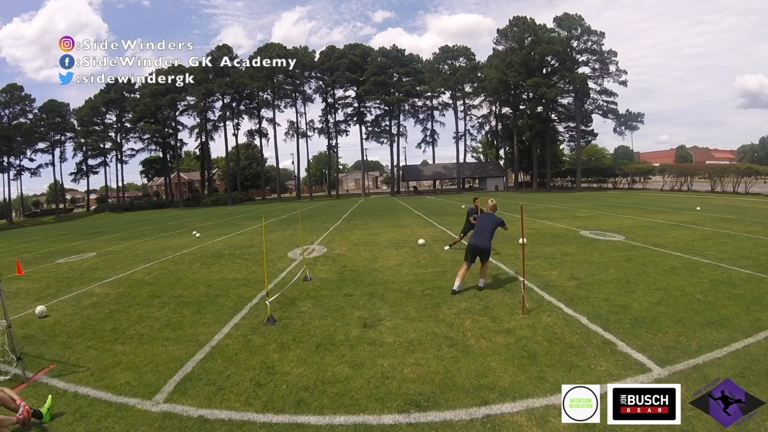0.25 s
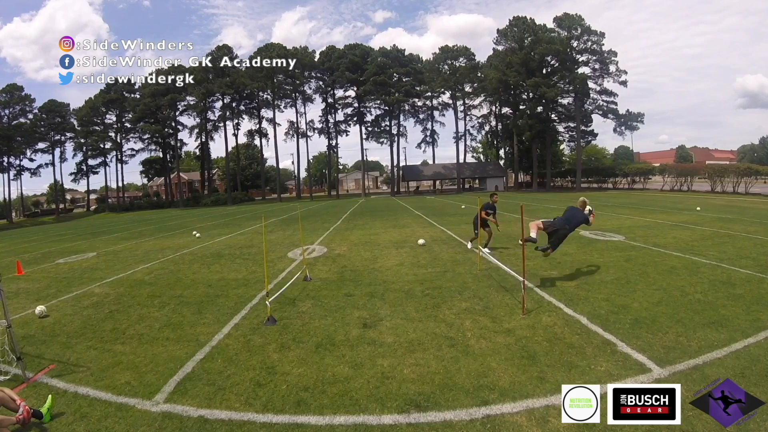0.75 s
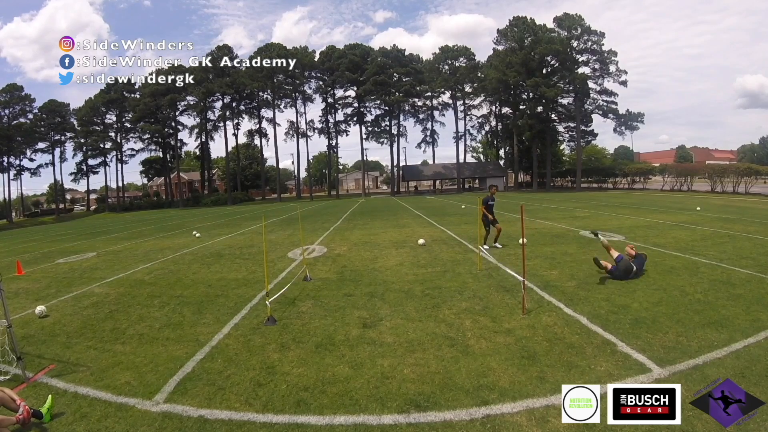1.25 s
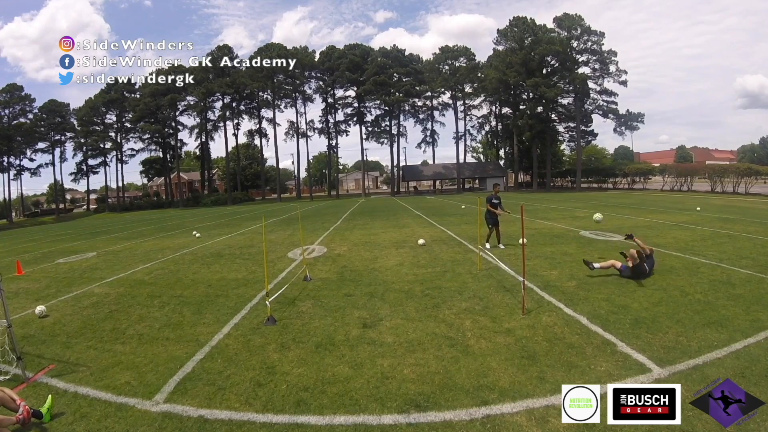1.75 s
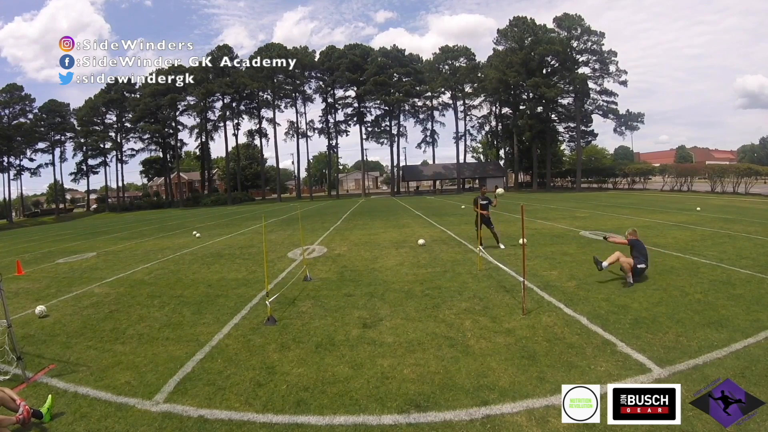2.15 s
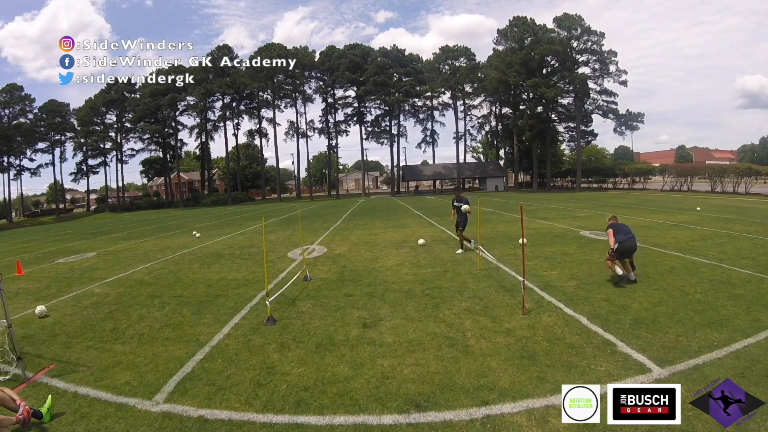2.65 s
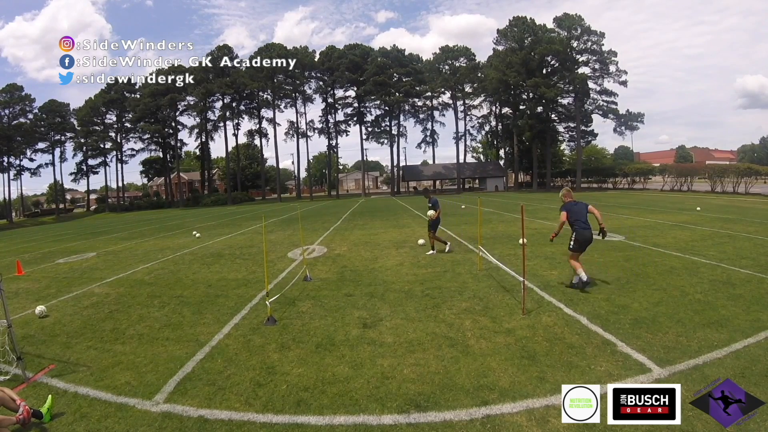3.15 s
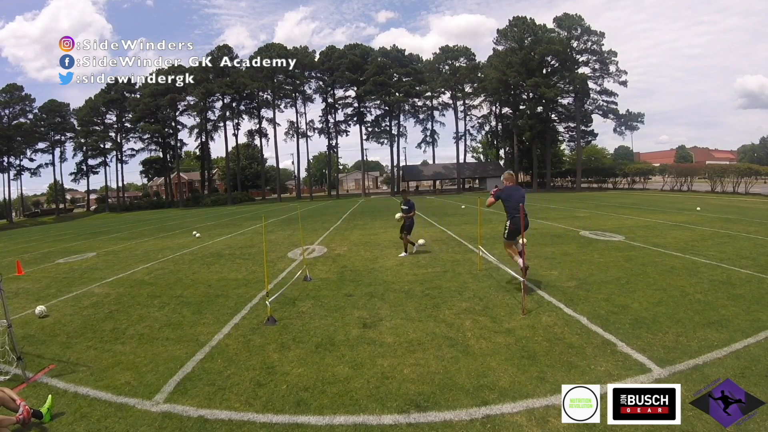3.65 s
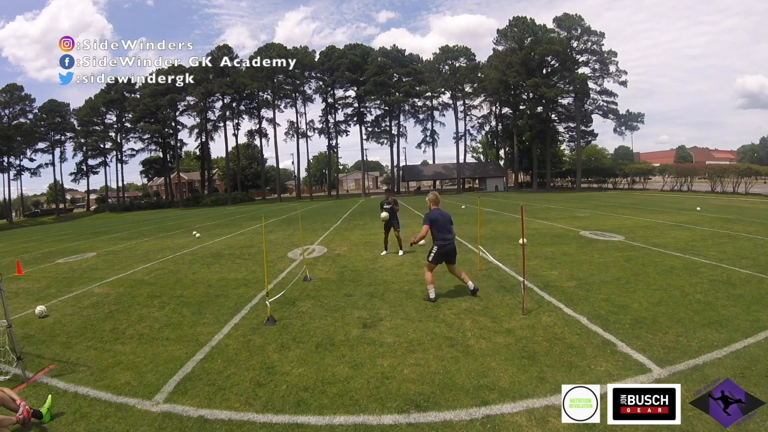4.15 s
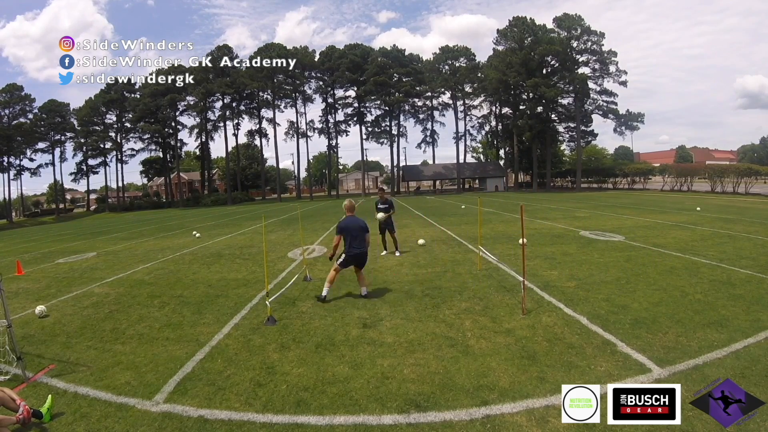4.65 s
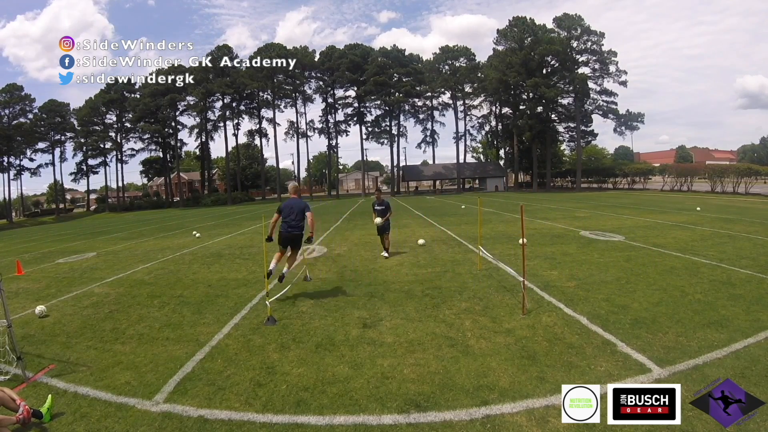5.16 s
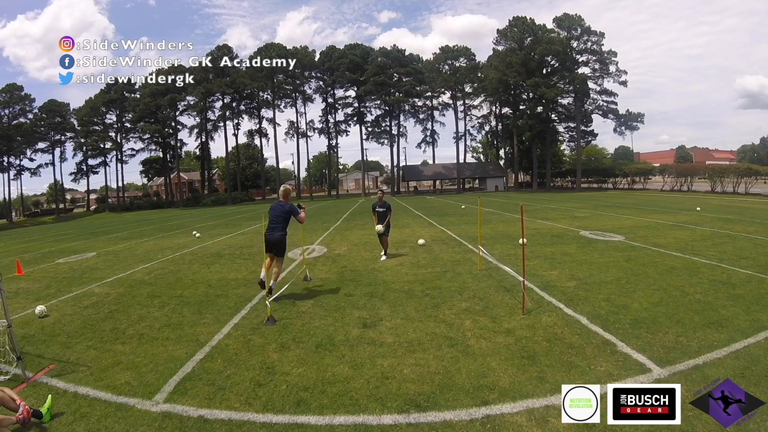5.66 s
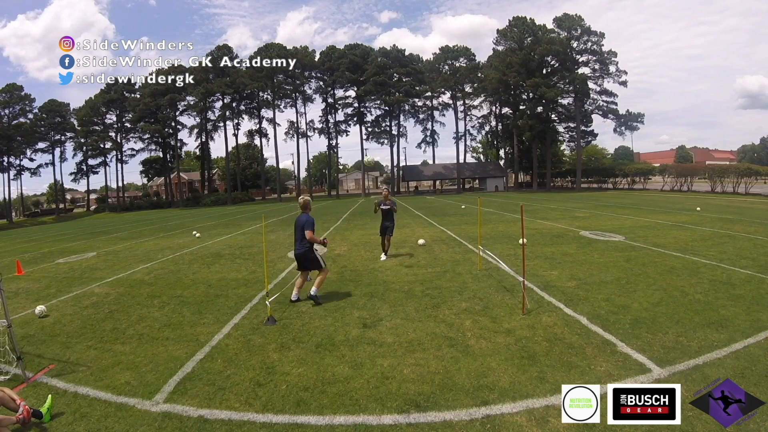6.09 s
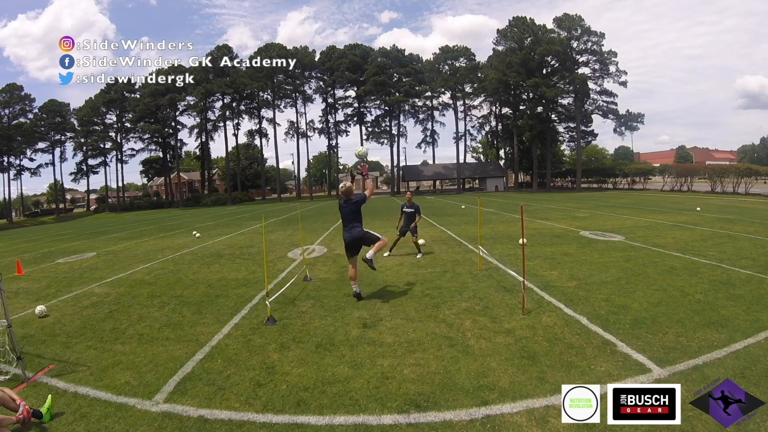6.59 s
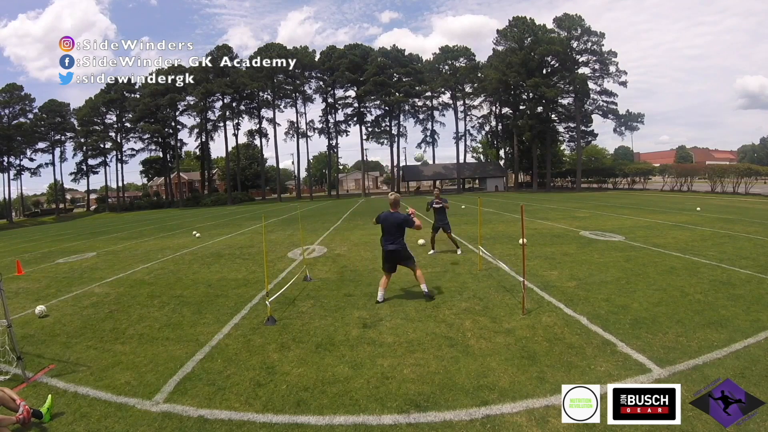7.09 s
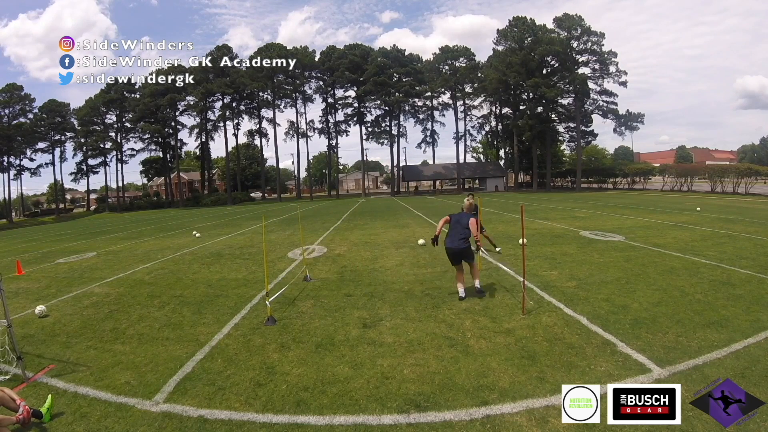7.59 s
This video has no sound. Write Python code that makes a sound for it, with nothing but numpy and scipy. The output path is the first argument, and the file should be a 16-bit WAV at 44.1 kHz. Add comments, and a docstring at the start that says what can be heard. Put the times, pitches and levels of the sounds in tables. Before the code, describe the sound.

Close wind rumbles, buffets and pops hard on a small camera microphone. Metres away on open grass, a ball is slapped, a diving body thuds down, and later catches and kicks smack sharply. Faint far birds call, then a songbird runs through quick dipping notes and slower rising ones. Soft outdoor hush, hiss and a thin whine lie underneath.

```python
"""Gusts rumble and buffet on a camera microphone, and single eddies pop on its port.
Some metres off on a grass field, ball contacts sound as noise slaps with a short modal ring and a thud.
A songbird runs through dipping, then rising notes, as swept sines; farther birds give short calls.
Behind it: outdoor hush and microphone hiss (shaped noise), a thin whine (wavering sine) and two dry clicks."""
import sys
import numpy as np
from scipy import signal
from scipy.fft import rfft, irfft, next_fast_len
from scipy.io import wavfile
from scipy.ndimage import uniform_filter1d, map_coordinates

SR = 44100
rng = np.random.default_rng(int(sys.argv[2]) if len(sys.argv) > 2 else 0)


def store_pcm(level_fs):
    """Save levels as 16-bit WAV."""
    pcm = np.round(np.clip(level_fs, -1, 1) * 32767).astype(np.int16)
    wavfile.write(sys.argv[1], SR, np.atleast_2d(pcm).T)


N = 345303

# Spectrum of distant trees and town: (frequency [Hz], relative density [dB])
HUSH_SPECTRUM = [(100, 9), (400, 3.5), (700, 3), (1200, -0.5), (2000, -4.5), (2700, -6.5), (3300, -6),
                 (3800, -8.5), (4500, -15), (6000, -17), (10000, -36.5), (14000, -55)]
# Spectrum of microphone self-noise: (frequency [Hz], relative density [dB])
HISS_SPECTRUM = [(1000, -22), (5000, -31), (6100, -7.5), (6520, 4), (7000, -3.5), (9000, -7.5),
                 (10500, -17), (12000, -11.5), (13300, -20), (14200, -24.5)]
# Course of the whine: (time [s], level before trim [dB])
WHINE_COURSE = [(0.05, -81), (0.11, -67), (0.2, -73), (0.33, -65), (0.44, -81), (0.55, -66), (0.67, -74),
                (0.8, -68), (0.89, -79), (1.19, -71.5), (1.25, -79), (1.34, -72), (1.77, -79.5), (1.9, -74),
                (1.97, -82), (2.27, -70), (2.44, -82), (2.51, -67), (2.74, -76.5), (3.22, -76), (3.26, -67),
                (3.35, -80), (3.46, -77), (3.61, -79), (4.0, -77), (4.06, -69), (4.15, -82.5), (4.42, -73),
                (4.82, -68), (4.95, -75), (5.15, -68), (5.27, -79), (5.4, -66), (5.48, -80), (5.78, -73),
                (5.85, -82), (6.15, -67.5), (6.21, -78), (6.47, -70.5), (6.58, -86), (6.8, -71), (6.9, -80),
                (7.05, -70), (7.2, -67), (7.31, -74), (7.42, -64), (7.53, -77), (7.7, -66), (7.75, -85),
                (7.79, -66)]
# Tiny dry clicks: (time [s], peak [dB])
TICK_EVENTS = [(0.538, -46), (1.681, -36.5)]
# Dipping song syllable: (share of length [0-1], nominal pitch [Hz], relative level [dB])
DIP_SYLLABLE = [(0, 4600, -10), (.09, 4300, -12), (.2, 3800, -1), (.35, 3350, 0), (.45, 3100, -8),
                (.55, 3200, -1), (.64, 3550, 4), (.74, 4050, 2), (.83, 4550, -4), (.92, 5000, -3),
                (1, 5050, -6)]
# Rising song syllable: (share of length [0-1], nominal pitch [Hz], relative level [dB])
RISING_SYLLABLE = [(0, 3250, -6), (.12, 3200, 2), (.22, 3000, -2), (.25, 3500, -7), (.33, 3650, 1),
                   (.39, 3800, -6), (.46, 3550, 0), (.55, 3750, 3), (.61, 4100, -2), (.69, 4650, -7),
                   (.79, 5100, -4), (.88, 5330, -2.5), (.96, 5400, -5), (1, 5300, -11)]
# Run of dipping notes: (first note ends [s], notes [count], note spacing [s], note length [s])
DIP_NOTES = (4.489, 16, .0803, .066)
# Run of rising notes: (first note ends [s], notes [count], note spacing [s], note length [s])
RISING_NOTES = (5.789, 11, .1006, .08)
# Calls of farther birds: (time [s], length [s], start pitch [Hz], glide [Hz], level before flicker [dB],
# hoarseness [share of pitch])
FAR_CALLS = [(1.78, 0.078, 3550, 20.5, -72.5, 0.0028), (2.68, .04, 3780, -82, -73, .012),
             (3.134, .06, 3780, 0, -69, .015), (3.273, .055, 3830, -2, -66, 0.053),
             (3.428, 0.09, 3770, -60, -62.5, 0.0054), (3.454, 0.055, 2940, -40, -65, .006),
             (3.558, 0.17, 3700, -51, -67.5, 0.016), (4.36, 0.037, 3100, 0, -72, .006)]
# Boot, glove and body contacts: (time [s], level [dB], brightness edge [Hz], slap t60 [s],
# thud re level [dB], ring re level [dB])
CONTACTS = [(0.696, -46, 4300, 0.021, 16, -12), (1.032, -47.5, 4050, 0.052, -5, -21),
            (1.0356, -33.5, 1680, 0.016, 22, -19), (1.049, -52, 6040, 0.07, 0, -9),
            (2.1694, -45, 4970, 0.055, 2, -1), (2.179, -57.5, 4400, 0.58, 0, -15),
            (4.569, -55.5, 4000, 0.058, 0, -11), (5.665, -56, 4300, 0.36, -6, -19),
            (6.462, -55.5, 6000, 0.099, 0, -12), (6.7292, -40.5, 3420, 0.044, 2, -9.5),
            (6.741, -51, 3400, 0.048, -5, -5), (7.421, -45, 6230, 0.083, -7, -20),
            (7.432, -40, 5360, 0.034, -23, -5), (7.435, -51.5, 1390, 0.027, 20, -10)]
# Modes of ball shell and trapped air: (nominal frequency [Hz], nominal relative level [dB], t60 [s])
BALL_MODES = [(412, 4, 0.082), (496, 0, 0.07), (750, -4, 0.035), (1010, 1, 0.045), (1208, 0, 0.066),
              (1530, -16, 0.06), (1680, -15, 0.036), (2180, -18, 0.075)]
# Gusts at the port: (time [s], deep rumble [dB], buffeting before trim [dB])
GUSTS = [(0.0, -27, -19), (0.1, -33.5, -37.5), (0.19, -31.5, -31.5), (0.34, -34, -38), (0.44, -22.5, -25),
         (0.53, -31.5, -38.5), (0.69, -32, -29), (1.2, -31.5, -35), (1.4, -28.5, -28.5), (1.72, -24, -30),
         (1.81, -25.5, -29), (1.88, -37.5, -38), (1.93, -24, -34), (2.02, -37, -49), (2.13, -22, -26.5),
         (2.23, -35.5, -37.5), (2.33, -30, -29.5), (2.42, -29, -35.5), (2.68, -32, -42.5),
         (2.76, -25.5, -29), (2.95, -33.5, -43.5), (3.03, -29, -31), (3.31, -35.5, -45.5), (3.42, -30, -44),
         (3.58, -37, -43.5), (3.66, -32, -38.5), (3.79, -25, -31.5), (3.87, -35.5, -47),
         (4.12, -27.5, -33.0), (4.38, -25, -33), (4.43, -29, -36.5), (4.54, -33, -42.5), (4.66, -28, -34.5),
         (4.87, -34.5, -45), (5.03, -33, -45), (5.11, -33, -31.5), (5.27, -36, -40), (5.36, -26.5, -40),
         (5.45, -28.5, -39), (5.53, -39, -39.5), (6.01, -29.5, -39.5), (6.11, -41.5, -58), (6.18, -32, -43),
         (6.32, -29, -42.5), (6.49, -41.5, -51.5), (6.56, -33.5, -44.5), (6.7, -34, -46),
         (6.87, -36.5, -50), (6.93, -44, -54), (7.04, -44.5, -52), (7.65, -45, -52.5), (7.83, -30.5, -39.5)]
# Spectrum of slow, large eddies: (frequency [Hz], relative density [dB])
RUMBLE_SPECTRUM = [(12, -28), (22, 5), (32, 8), (50, 3.5), (75, 5), (105, 1), (160, -11), (220, -43),
                   (350, -100)]
# Spectrum of buffeting: (frequency [Hz], relative density [dB])
BUFFET_SPECTRUM = [(50, -4.5), (100, -2.5), (150, 4.5), (220, -3.5), (320, -14.5), (450, -28.5), (650, -38),
                   (1000, -64), (2000, -110)]
# Strongest eddies: (time [s], level before trim [dB], half width [s], crackle [dB])
POP_EVENTS = [(0.01, -18.5, 0.0013, -35), (0.026, -19, 0.00072, -54), (0.042, -26.5, 0.00068, -44),
              (0.063, -27, 0.00088, -46), (0.193, -20.5, 0.0017, -68), (0.402, -20, 0.0022, -50),
              (0.414, -13.5, 0.0012, -41), (0.419, -16, 0.0016, -46), (0.427, -25, 0.0013, -51),
              (0.433, -13.5, 0.0018, -56), (0.454, -15, 0.002, -60), (0.479, -16.5, 0.0019, -48.5),
              (0.569, -22.5, 0.0012, -51), (0.615, -20, 0.0024, -66), (0.694, -11.5, 0.0019, -64),
              (0.712, -15, 0.0021, -67), (0.748, -18.5, 0.0017, -66), (0.8, -24, 0.0014, -49.5),
              (0.878, -22.5, 0.0013, -51.5), (0.894, -16, 0.0022, -60), (0.948, -20.5, 0.002, -62),
              (1.383, -13.5, 0.0021, -57), (1.405, -14.5, 0.0014, -56), (1.542, -17, 0.0015, -50),
              (1.567, -7.5, 0.0019, -61), (1.649, -12, 0.0023, -61), (1.714, -10, 0.0047, -56),
              (1.74, -11.5, 0.0019, -58), (1.772, -29, 0.0016, -60), (1.82, -26, 0.0014, -52),
              (2.079, -20.5, 0.0016, -61), (2.109, -15.5, 0.002, -56), (2.152, -17.5, 0.0014, -46),
              (2.189, -11.5, 0.0031, -52), (2.265, -16, 0.0026, -62), (2.315, -9.5, 0.0018, -54),
              (2.618, -18.5, 0.0019, -55), (2.755, -27, 0.0012, -60), (2.772, -18.5, 0.0013, -47.5),
              (2.911, -16, 0.0029, -68), (3.024, -12.5, 0.0037, -73), (3.653, -22.5, 0.0018, -53.5),
              (4.062, -19, 0.0016, -56), (4.154, -15.5, 0.0027, -66), (4.311, -19.5, 0.0022, -64),
              (4.367, -21, 0.0019, -55), (4.386, -11, 0.005, -68), (4.616, -11, 0.0026, -64),
              (4.815, -22.5, 0.0027, -66), (5.124, -7.5, 0.0028, -60), (5.155, -26, 0.0013, -50),
              (5.215, -22, 0.0027, -68), (5.44, -26, 0.0012, -68), (5.446, -10.5, 0.0034, -66),
              (5.587, -18, 0.0018, -51.5), (5.603, -25.5, 0.0011, -60), (5.667, -30.5, 0.00087, -67),
              (5.832, -27, 0.0013, -64), (6.44, -19.5, 0.003, -68), (6.563, -18, 0.0031, -67),
              (7.758, -26, 0.0017, -55), (7.824, -7.5, 0.0024, -66)]
# Spectrum of an eddy tearing at the port's edge: (frequency [Hz], relative density [dB])
CRACKLE_SPECTRUM = [(250, -43), (600, 3.5), (1100, -6.5), (1600, -20.5), (2300, -31.5), (4000, -62),
                    (8000, -100)]


def amp(db):
    """Decibels to gain."""
    return 10 ** (np.asarray(db) / 20)


def unit(x):
    """Scale to rms 1."""
    return x / np.sqrt(np.mean(x ** 2) + 1e-20)


def curves(rows):
    """One value per sample for each column after the time."""
    time_s, *columns = np.transpose(rows)
    return [np.interp(np.arange(N) / SR, time_s, column) for column in columns]


def wobble(knots_per_s):
    """Smooth random curve of rms 1 through evenly spaced random knots."""
    knots = rng.standard_normal(int(N * knots_per_s / SR) + 4)
    return unit(map_coordinates(knots, [np.arange(N) * knots_per_s / SR]))


def filtered(x, response):
    """Multiply the spectrum of x by a response of frequency in Hz."""
    size = next_fast_len(len(x) + 8192)
    spectrum = rfft(x, size) * response(np.fft.rfftfreq(size, 1 / SR))
    return irfft(spectrum, size)[:len(x)]


def noise(points):
    """Noise of rms 1, its spectrum interpolated in dB over log frequency."""
    point_hz, db = np.transpose(points)

    def response(hz):
        return amp(np.interp(np.log(hz + 1), np.log(point_hz + 1), db))

    return unit(filtered(rng.standard_normal(N), response))


def steady(x, size):
    """Even out slow swells over about size samples."""
    power = uniform_filter1d(uniform_filter1d(x * x, size), size)
    return x / np.sqrt(np.abs(power) + 1e-9)


def add(track, start_s, sound):
    """Mix a sound into the track, cropped at both ends."""
    start = round(start_s * SR)
    part = sound[max(-start, 0):max(N - start, 0)]
    track[max(start, 0):][:len(part)] += part


def hush_and_hiss(hush_db=-58.5, hiss_db=-71, rise_db=2):
    """Shaped noise of outdoor air and microphone, both growing slowly by rise_db."""
    rise = rise_db * np.linspace(-.5, .5, N)
    hush = amp(hush_db + rise + 0.063 * wobble(4.6)) * noise(HUSH_SPECTRUM)
    hiss = amp(hiss_db + rise) * noise(HISS_SPECTRUM)
    return hush + hiss


def whine(center_hz=2952, waver_hz=3, trim_db=1, flutter_db=1.45):
    """Thin tone wavering in pitch; its level swells, fades and flutters."""
    phase = 2 * np.pi * np.cumsum(center_hz + waver_hz * wobble(25)) / SR
    level_db = curves(WHINE_COURSE)[0] + trim_db + flutter_db * wobble(25)
    return amp(level_db) * unit(np.sin(phase))


def ticks(decay_s=0.00014):
    """Exponential clicks, far too short to ring."""
    out, t = np.zeros(N), np.arange(256) / SR
    for time_s, peak_db in TICK_EVENTS:
        add(out, time_s, amp(peak_db) * np.exp(-t / decay_s))
    return out


def trill(syllable, run, crescendo_db, scatter_db=1.6, detune_share=.01, rasp_share=.007):
    """One swept-sine syllable, roughened by quick pitch tremor, repeats evenly in a crescendo."""
    first_end_s, notes, spacing_s, length_s = run
    share, pitch_hz, shape_db = np.transpose(syllable)
    out, u = np.zeros(N), np.linspace(0, 1, int(length_s * SR))
    rasp = rasp_share * wobble(600)
    for k, note_db in enumerate(np.linspace(*crescendo_db, notes)):
        start_s = first_end_s + k * spacing_s - length_s
        detune, scatter = rng.standard_normal(2)
        tremor = rasp[int(start_s * SR):][:len(u)]
        hz = np.interp(u, share, pitch_hz) * (1 + detune_share * detune + tremor)
        level = amp(note_db + scatter_db * scatter + np.interp(u, share, shape_db))
        tone = np.sin(2 * np.pi * np.cumsum(hz) / SR)
        add(out, start_s, level * signal.windows.tukey(len(u), .12) * tone)
    return out


def far_calls():
    """Short gliding sines; random pitch tremor makes some hoarse."""
    out, rasp = np.zeros(N), wobble(500)
    for time_s, length_s, start_hz, glide_hz, db, hoarse in FAR_CALLS:
        size = int(length_s * SR)
        tremor = 1 + hoarse * rasp[int(time_s * SR):][:size]
        hz = (start_hz + np.linspace(0, glide_hz, size)) * tremor
        tone = np.sin(2 * np.pi * np.cumsum(hz) / SR)
        add(out, time_s, amp(db) * signal.windows.tukey(size, .3) * tone)
    return out


def birds(flicker_db=1.4, flicker_knots_per_s=120):
    """A dipping run, a slower rising run and farther calls, roughened in level by moving air."""
    dips = trill(DIP_SYLLABLE, DIP_NOTES, crescendo_db=(-77, -63.5))
    rises = trill(RISING_SYLLABLE, RISING_NOTES, crescendo_db=(-68, -65.5))
    return (dips + rises + far_calls()) * amp(flicker_db * wobble(flicker_knots_per_s))


def trees(x, t60_s):
    """Diffuse scatter from the tree line: convolution with decaying noise of unit energy."""
    t = np.arange(SR // 2) / SR
    tail = rng.standard_normal(len(t)) * amp(-60 * t / t60_s)
    return signal.fftconvolve(x, tail / np.linalg.norm(tail))[:N]


def slap_noise(size, edge_hz):
    """Contact noise of rms 1: weak bass, falling treble, steep roll-off above edge_hz."""
    def response(hz):
        bass_cut = hz / (hz + 300)
        return bass_cut / np.hypot(1, hz / 2000) / np.hypot(1, (hz / edge_hz) ** 4)

    return unit(filtered(rng.standard_normal(size), response))


def ball_ring(t, scatter_db=3, detune_share=.02):
    """Decaying modes, scattered because each contact strikes a different spot."""
    ring = np.zeros(len(t))
    for mode_hz, mode_db, t60_s in BALL_MODES:
        level = amp(mode_db + rng.normal(0, scatter_db) - 60 * t / t60_s)
        hz = mode_hz * rng.normal(1, detune_share)
        ring += level * np.sin(2 * np.pi * (hz * t + rng.uniform()))
    return ring


def hits(thud_hz=170, thud_t60_s=0.024, attack_s=0.00037):
    """Each contact sums a noise slap, a short ball ring and a soft low thud."""
    out, t = np.zeros(N), np.arange(SR // 3) / SR
    onset = 1 - np.exp(-t / attack_s)
    for time_s, db, edge_hz, slap_t60_s, thud_db, ring_db in CONTACTS:
        slap = slap_noise(len(t), edge_hz) * amp(-60 * t / slap_t60_s)
        ring = amp(ring_db) * ball_ring(t)
        thud = amp(thud_db - 60 * t / thud_t60_s) * np.sin(2 * np.pi * thud_hz * t)
        add(out, time_s, amp(db) * onset * (slap + ring + thud))
    return out


def eddy(half_width_s, turn_rad):
    """Pressure pulse of a vortex passing the port; the narrower it is, the higher it reaches."""
    t = np.arange(-1536, 1536) / SR
    pulse = np.exp(1j * turn_rad) / (1 - 1j * t / half_width_s) ** 2
    return np.real(pulse) * np.hanning(len(t))


def flutter(buffet_db, base_db=-33, growth=1.26, spread_db=4, half_width_s=0.002):
    """400 small eddies at random times, stronger in gusts; broader ones are stronger."""
    out = np.zeros(N)
    for when, turn, rarity, breadth in rng.uniform(size=(400, 4)):
        at, scale = int(when * (N - 1)), 2 ** (breadth - .5)
        # most are weak, a few strong
        db = base_db + growth * (buffet_db[at] + 30) - spread_db * np.log(rarity + 0.011)
        pulse = eddy(half_width_s * scale, 2 * np.pi * turn)
        add(out, (at - len(pulse) / 2) / SR, amp(db) * scale * pulse)
    return out


def wind(buffet_trim_db=-2, lumps_db=4, surges_db=0.5):
    """Deep rumble and lumpy buffeting follow the gusts, with small eddies fluttering on top."""
    rumble_db, buffet_db = curves(GUSTS)
    lumps = lumps_db * wobble(35)  # turbulence swells both layers together, the rumble half as much in dB
    surges = surges_db * wobble(11)  # large eddies roll through each gust
    rumble = unit(amp(lumps / 2) * steady(noise(RUMBLE_SPECTRUM), size=3000))
    buffet = unit(amp(lumps) * steady(noise(BUFFET_SPECTRUM), size=1500))
    rumble *= amp(rumble_db + surges)
    buffet *= amp(buffet_db + surges + buffet_trim_db)
    return rumble + buffet + flutter(buffet_db)


def pops(trim_db=-0.5, crackle_width_s=0.0038):
    """Strong eddies strike the port at random angles; each tears with a brief noise crackle."""
    out, tearing = np.zeros(N), np.zeros(N)
    turns_rad = rng.uniform(0, 2 * np.pi, len(POP_EVENTS))
    for (time_s, db, half_width_s, crackle_db), turn_rad in zip(POP_EVENTS, turns_rad):
        pulse = eddy(half_width_s, turn_rad)
        t = (np.arange(len(pulse)) - len(pulse) / 2) / SR
        add(out, time_s + t[0], amp(db + trim_db) * pulse)
        add(tearing, time_s + t[0], amp(crackle_db) * np.exp(-.5 * (t / crackle_width_s) ** 2))
    return out + tearing * noise(CRACKLE_SPECTRUM)


def scene():
    """Wind on the port in front; play and birds, each with its tree echo, out on the field."""
    background = hush_and_hiss() + whine() + ticks()
    song, play = birds(), hits()
    song_echo = amp(-3.5) * trees(song, t60_s=.28)
    play_echo = amp(-22.5) * trees(play, t60_s=.24)
    field = song + song_echo + play + play_echo
    return (background + field + wind() + pops())[None]


def record(dry, bass_hz=16, top_hz=14200):
    """The camera drops the deepest bass and everything above its band limit."""
    def response(hz):
        return (hz < top_hz) * hz ** 2 / np.hypot(hz ** 2, bass_hz ** 2)

    return filtered(dry[0], response)[None]


dry = scene()
out = record(dry)
store_pcm(out)
```